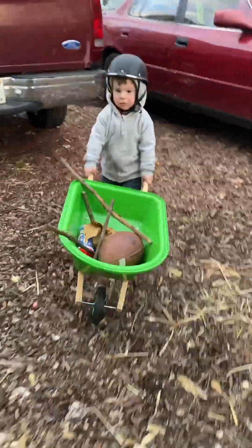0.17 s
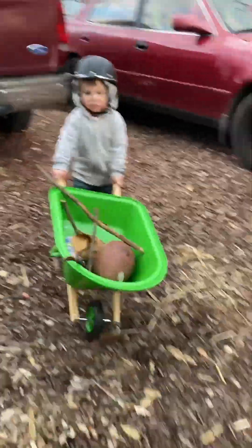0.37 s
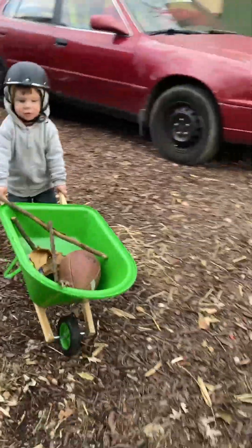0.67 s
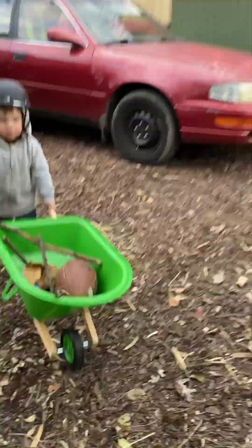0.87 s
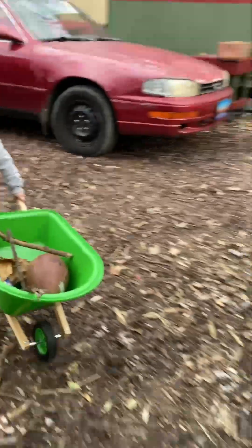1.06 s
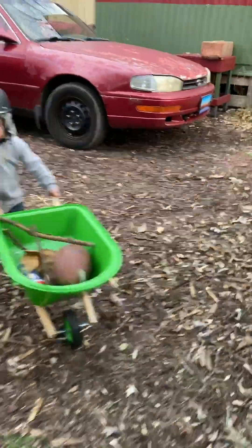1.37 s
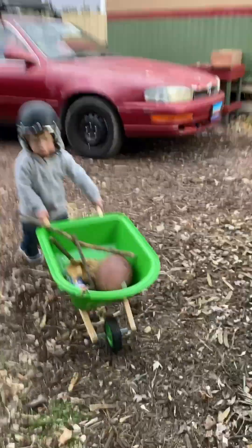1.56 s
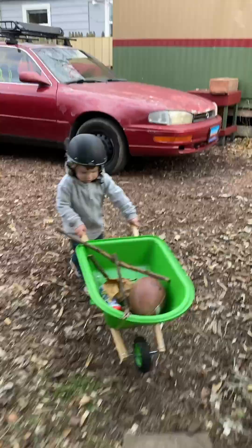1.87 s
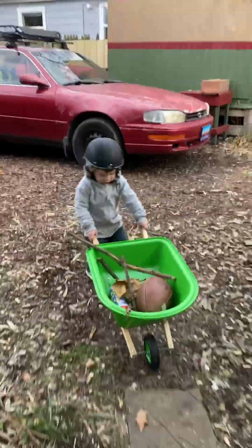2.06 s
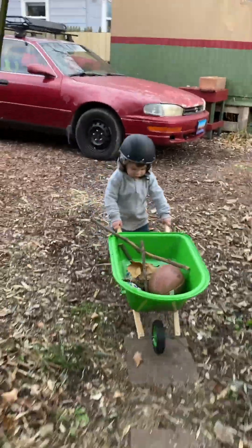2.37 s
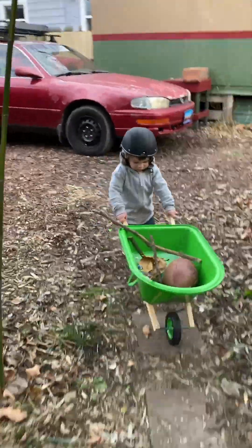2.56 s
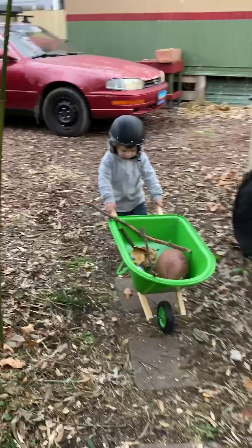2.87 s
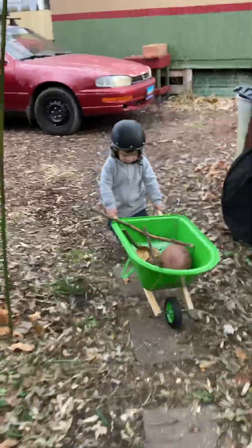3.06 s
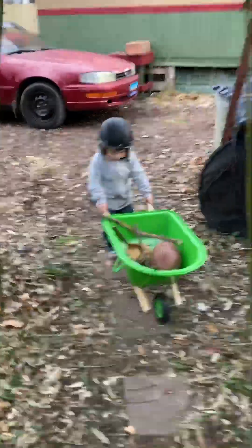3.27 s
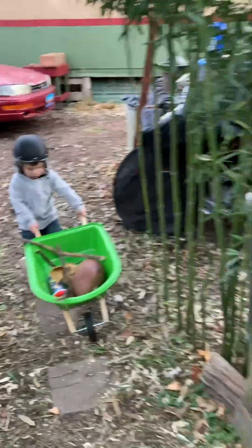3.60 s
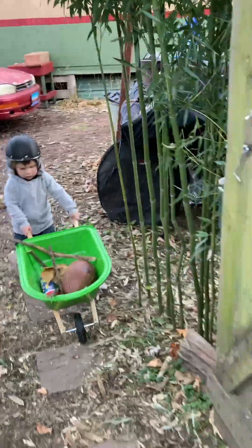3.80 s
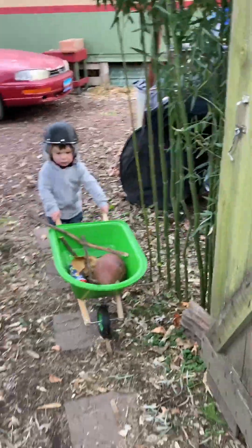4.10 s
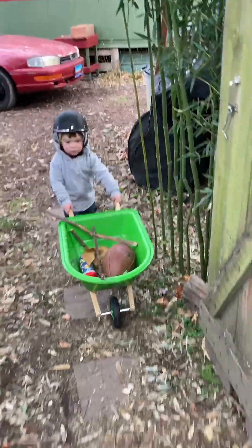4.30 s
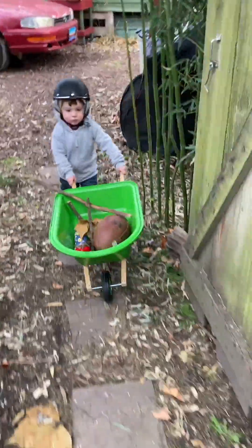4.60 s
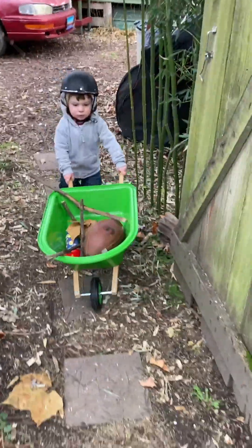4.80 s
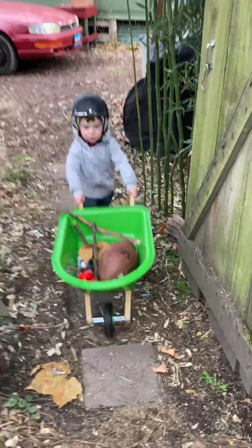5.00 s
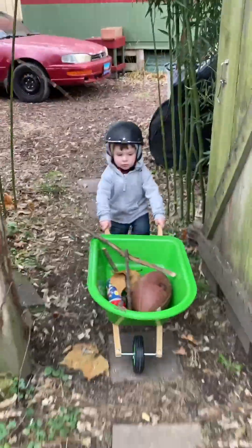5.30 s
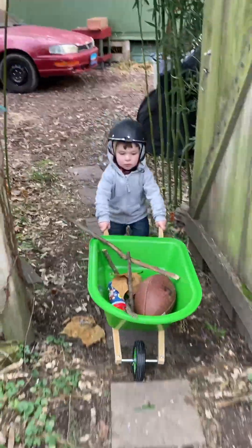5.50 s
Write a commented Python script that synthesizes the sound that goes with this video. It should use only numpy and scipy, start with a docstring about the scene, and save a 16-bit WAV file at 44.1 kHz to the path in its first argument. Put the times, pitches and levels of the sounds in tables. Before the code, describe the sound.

Wood-chip mulch crunches and snaps under a toddler's shoes and a toy wheelbarrow, its tub knocking louder as it nears.

```python
"""A yard of wood-chip mulch and paving stones: a toddler pushes a small plastic wheelbarrow closer.
Each shove sets the hollow tub rattling as random contacts drive its resonances; each bump jolts tub, hub and frame.
Chips crunch and snap under wheel and shoes as short bursts of clicks and noise, ringing at the pitch of each chip.
A bird chips once and a thin whine comes and goes over the low noise of the yard.
Two closely spaced microphone ports hear it, with phase, balance and likeness that depend on frequency."""
import sys
import numpy as np
from scipy import signal
from scipy.fft import rfft, irfft, next_fast_len
from scipy.io import wavfile
from scipy.ndimage import uniform_filter1d

SR = 44100
rng = np.random.default_rng(int(sys.argv[2]) if len(sys.argv) > 2 else 0)


def put_to_file(sound):
    """Save the sound as 16-bit audio at rate SR, in the file named by the first command-line argument."""
    columns = np.atleast_2d(sound).T  # one column per channel
    safe = np.clip(columns, -1, 1)
    whole_steps = np.round(safe * 32767)
    wavfile.write(sys.argv[1], SR, whole_steps.astype(np.int16))


N = 249165
TIME = np.arange(N) / SR

# The wheel hits a bump. Each row: start in seconds, knock of the tub in dB, clack of the hub in dB,
# thump of the frame in dB, hardness in dB, pitch of the hub in Hz.
BUMPS = [(0.043, -52, -47.5, -70, -6, 1030), (0.232, -39.5, -37, -49, 0, 964),
         (0.253, -48, -42, -60, -3, 990), (0.295, -41.5, -38, -42, -5, 970),
         (0.329, -36, -42, -49, -10, 1086), (0.467, -45, -61, -57, -3, 1086),
         (0.52, -42, -47, -41, -2, 1086), (0.552, -39, -47, -43, -12, 1086),
         (0.608, -42.5, -62, -46, -6, 1086), (0.632, -42.5, -46, -57, -2.5, 1086),
         (0.745, -46, -51, -64, -12, 1086), (0.832, -42, -56, -45, 4, 1086),
         (0.858, -39, -62, -61, -10, 1086), (0.876, -40.5, -56, -45, 0, 1086),
         (0.943, -37, -35, -47, -5, 1026), (0.995, -36.5, -66, -55, -10, 1086),
         (1.114, -48, -50, -48, -5, 1086), (1.139, -42, -50, -49, -1, 1086),
         (1.21, -37.5, -39, -40, -2, 1124), (1.234, -46, -54, -38, 0, 1086),
         (1.339, -38, -49, -35, 5, 1086), (1.42, -32.5, -35.5, -34.5, -4.5, 1080),
         (1.456, -41, -62, -44, -17, 1086), (1.523, -37.5, -44, -43, 2, 1086),
         (1.54, -37.5, -43, -56, -2, 1010), (1.705, -44, -50, -57, 1, 1086),
         (1.922, -38, -42, -45, 6, 1086), (1.953, -36.5, -46, -52, -4, 1086),
         (1.996, -44.5, -50, -42, 4, 1086), (2.23, -35, -56, -36.5, -6, 1086),
         (2.261, -47, -59, -46, -2, 1086), (2.301, -42.5, -47, -58, -3.5, 1086),
         (2.332, -42, -51, -59, 0, 1086), (2.348, -46, -47, -62, -5, 1086),
         (2.418, -39, -40, -61, 5.5, 1147), (2.46, -37.5, -62, -60, -14.5, 1086),
         (2.503, -54, -65, -57, 6, 1086), (2.651, -44, -69, -44, -18, 1086),
         (2.734, -50.5, -61, -51, 8, 1086), (2.794, -60, -51, -44.5, -2, 1086),
         (2.835, -57, -48.5, -46, 0.5, 1086), (2.954, -52, -64, -49, 18, 1086),
         (2.978, -49, -58, -46, 3, 1086), (3.057, -47, -45.5, -43.5, -1, 1086),
         (3.113, -45, -47, -53, 11, 1100), (3.294, -42.5, -38, -37.5, -0.5, 1004),
         (3.348, -47, -42, -39, -3, 1086), (3.419, -45.5, -40, -36.5, 1, 1087),
         (3.491, -38.5, -37.5, -41, -1, 1066), (3.533, -58, -48.5, -48, -0.5, 1086),
         (3.863, -38.5, -48, -40, -1.5, 1050), (3.872, -43.5, -38, -48, 1.5, 1150),
         (3.936, -50, -43, -47, -3.5, 1086), (4.01, -30.5, -34, -33, -11, 1025),
         (4.028, -44, -45, -43, -6, 1086), (4.065, -42, -47, -54, -15, 1086),
         (4.11, -37.5, -40, -30, -0.5, 1086), (4.177, -41.5, -53, -43, -11, 1086),
         (4.256, -41, -43, -32, 2.5, 1086), (4.335, -46.5, -41.5, -47, 4, 1110),
         (4.63, -43, -41, -40, 14, 1086), (4.646, -36.5, -40, -39, -8, 1086),
         (4.7, -29, -27.5, -34, 4.5, 1100), (4.742, -32, -53, -30, 3, 1086),
         (4.865, -37, -43, -37, 4, 1086), (4.973, -40, -39.5, -41, -2, 1086),
         (5.069, -29, -34, -36, 1, 1086), (5.082, -36, -32.5, -31, 1, 1086),
         (5.123, -44, -55, -43, -5, 1086), (5.148, -25, -29, -35.5, 0.5, 1086),
         (5.17, -39, -47, -38, 1, 1086), (5.189, -45, -44, -37, 3, 1120), (5.208, -32, -37, -50, 7, 1086),
         (5.246, -38, -40.5, -61, 9, 1055), (5.266, -45, -41, -52, 2, 1086),
         (5.361, -36, -41, -55, -2, 1040), (5.4, -34, -40, -43, -2, 1086), (5.468, -41, -57, -60, -7, 1086),
         (5.481, -51, -40.5, -56, -1.5, 1086), (5.529, -29.5, -54, -26.5, -5, 1086),
         (5.564, -31, -31.5, -38, 1.5, 1126), (5.615, -32, -38, -32, -2, 1086),
         (5.623, -29, -33.5, -32.5, 2, 1086), (5.642, -40, -46, -39, -2, 1086)]


def from_db(db):
    """Decibels to gain."""
    return 10 ** (np.asarray(db) / 20)


def rms_one(x):
    """Scale to rms 1."""
    return x / np.sqrt(np.mean(x ** 2) + 1e-20)


def energy_one(x):
    """Scale a short sound so that its energy equals that of 4 ms at rms 1."""
    return x / np.sqrt(np.sum(x ** 2) / (SR * 0.004) + 1e-20)


def evened(x, seconds):
    """Hold the running rms near 1, keeping the fast detail."""
    power = np.abs(uniform_filter1d(x * x, int(seconds * SR) + 1))
    return x / np.sqrt(power + 1e-3 * np.mean(x * x))


def at_hz(points, hz):
    """Read a table on a log-frequency axis."""
    table_hz, values = np.array(points).T
    return np.interp(np.log(hz + 1e-9), np.log(table_hz), values)


def add(track, s, sound):
    """Mix a sound into the track from time s on."""
    start = max(int(s * SR), 0)
    track[start:start + len(sound)] += sound[:max(N - start, 0)]


def noise(spectrum):
    """Noise of the given colour, rms 1."""
    gain = from_db(at_hz(spectrum, np.fft.rfftfreq(N, 1 / SR)))
    return rms_one(irfft(rfft(rng.standard_normal(N)) * gain, N))


def drift(rate):
    """Slow chance with rms 1: straight lines between random points, `rate` points a second."""
    points = rng.standard_normal(N // 50)
    return rms_one(np.interp(TIME * rate, np.arange(len(points)), points))


def resonate(x, hz, width):
    """A two-pole resonance with gain 1 on top."""
    r = np.exp(-np.pi * width / SR)
    poles = [1, -2 * r * np.cos(2 * np.pi * hz / SR), r * r]
    return signal.lfilter(np.array([1, 0, -1]) * (1 - r * r) / 2, poles, x + 1e-18)


def resonate_twice(x, hz, width):
    """Two equal resonances in a row, for steeper skirts."""
    return resonate(resonate(x, hz, width), hz, width)


def grains(per_s, spread_db):
    """Random contacts: many small, a few large."""
    size_db = spread_db * np.minimum(rng.exponential(1, N), 4)
    return (rng.random(N) < per_s / SR) * from_db(size_db)


def swell(s, length):
    """Gain over time: a smooth rise and fall around time s, 17 dB down at `length` to either side."""
    return np.exp(-2 * np.minimum(((TIME - s) / length) ** 2, 10))


def efforts(rows, attack_s, release_s):
    """Gain over time: each effort builds up, is held and dies away."""
    gain = 0
    for s, held, db in rows:
        attack = np.clip((TIME - s) / attack_s, 0, 1)
        release = np.exp(-np.maximum(TIME - s - held, 0) / release_s)
        gain = gain + from_db(db) * attack * release
    return gain


def yard(level_db=-63):
    """The quiet yard: steady low-heavy noise, independent at the two ports."""
    # Colour of the yard. Each row: frequency in Hz, relative density in dB per Hz.
    yard_colour = [(15, -12), (30, 17.5), (55, 15.5), (120, 3), (400, 0.5), (1000, -2), (3000, -16.5),
                   (8000, -58), (16000, -50)]
    return from_db(level_db) * np.array([noise(yard_colour), noise(yard_colour)])


def rumble(coast_db, shove, lumpy_db=0.5):
    """The ground rumbles unevenly under the wheel, more with each shove, and swells with each thud."""
    # Dull thuds on soft ground. Each row: loudest moment in seconds, level in dB.
    thud_rows = [(0.36, -44), (0.59, -46), (0.77, -52), (1.445, -41), (1.731, -43), (1.833, -45.5),
                 (2.255, -41), (2.64, -43), (2.969, -45.5), (3.05, -48.5), (3.19, -46.5), (3.39, -64),
                 (3.579, -50.5), (3.753, -46.5), (4.07, -49), (4.15, -48), (4.3, -60), (4.471, -43),
                 (4.53, -50), (4.65, -40), (4.99, -46), (5.09, -34), (5.14, -45), (5.19, -44), (5.55, -41)]
    # Colour of the ground. Each row: frequency in Hz, relative density in dB per Hz.
    ground_colour = [(15, -55), (35, -27), (50, 3.5), (70, 5), (110, 1.5), (150, -3.5), (220, -7),
                     (400, -28), (900, -76)]
    thud = sum(from_db(db) * swell(s, 0.019) for s, db in thud_rows)
    coast = from_db(coast_db + lumpy_db * drift(14))
    # -15.5 dB under a full-scale shove, falling 0.69 dB per dB of rattle
    pushed = from_db(-15.5) * shove ** 0.69
    gain = np.sqrt(coast ** 2 + pushed ** 2 + thud ** 2)
    return gain * evened(noise(ground_colour), seconds=0.0447)


def tub(force, tilt_db, stretch=1):
    """Contacts drive each mode with random strength; tilt (dB an octave) favours high modes, flexing shifts pitch."""
    # The plastic tub with its load. Each row: mode in Hz, width of each resonance in Hz, level in dB.
    tub_modes = [(177, 102, -2.5), (260, 84, 2), (323.5, 178, 2.5), (404, 224, -5), (534.3, 99, 0),
                 (670, 340, -6), (973, 190, -4.5), (1176, 220, -8), (1400, 110, -13.5), (1635, 196, -8),
                 (1770, 194, -4.5), (2300, 720, -13), (2780, 410, -14.5)]
    lowest_hz = tub_modes[0][0]
    out = 0
    for hz, width, db in tub_modes:
        mode = resonate_twice(force * rng.standard_normal(len(force)), hz * stretch, width)
        out = out + from_db(db + tilt_db * np.log2(hz / lowest_hz)) * rms_one(mode)
    return out


def rattle(gain):
    """The wheel runs over chip after chip and keeps the tub trembling."""
    force = grains(per_s=380 * from_db(6 * drift(45)), spread_db=3.0)
    return gain * evened(tub(force, tilt_db=-0.4), seconds=0.23)


def ring_on(x):
    """Tub and frame keep ringing briefly after each contact."""
    # What rings on after a contact. Each row: frequency in Hz, width in Hz, level in dB.
    ring_modes = [(273, 6.4, -23), (544, 8.3, -26), (1190, 6.8, -32), (1375, 37, -9)]
    return x + sum(from_db(db) * resonate(x, hz, width) for hz, width, db in ring_modes)


def crunch(gain, width_hz=2200, count=16, crisp_above_hz=12000):
    """Clumps of tiny fractures, each ringing briefly at the pitch of its chip; the mix keeps changing."""
    # Dry chips. Each row: frequency in Hz, level in dB.
    chip_colour = [(2000, 4.5), (3300, -7), (4500, -2), (5600, 2), (8500, -1), (11500, 1), (13500, 1),
                   (16000, -1)]
    # Top of the crunch, highest among dry leaves, lowest on the stones. Each row: time in seconds, level in dB.
    crispness = [(0.5, -1.5), (1.7, 1), (2.6, -1.5), (4.7, 0), (5.0, -3), (5.65, -3)]
    crisp_db = np.interp(TIME, *np.transpose(crispness))
    clumps = np.maximum(drift(70), -1)
    clicks = grains(per_s=3900 * from_db(6 * clumps), spread_db=0.5) * rng.choice([-1, 1], N)
    dealt = rng.integers(0, count, N)   # which chip pitch each click gets
    chips = 0
    for k, hz in enumerate(np.linspace(2500, 15800, count)):
        level_db = at_hz(chip_colour, hz) + 2.0 * drift(25) + crisp_db * (hz > crisp_above_hz)
        chips = chips + from_db(level_db) * resonate(clicks * (dealt == k), hz, width_hz)
    return gain * evened(chips, seconds=0.081)


def crackle(gain, level_db=-7, per_s=95, low_hz=650, high_hz=2700, width_share=0.25, fall_db=-4, count=8):
    """Coarse chips and twigs knock under the wheel with short woody pitches, high ones weaker (dB an octave)."""
    clicks = grains(per_s=per_s, spread_db=4.0)
    dealt = rng.integers(0, count, N)
    wood = 0
    for k, hz in enumerate(np.geomspace(low_hz, high_hz, count)):
        knocks = resonate_twice(clicks * (dealt == k), hz, width_share * hz)
        wood = wood + rms_one(knocks) * from_db(fall_db * np.log2(hz / low_hz))
    return gain * from_db(level_db) * evened(wood, seconds=0.087)


def jolts(chatter_s=0.05, chatter_per_s=900, tilt_db=-1.5, tick_db=-20, tick_hz=4200):
    """A bump shakes the tub with a tight cluster of contacts; the stronger it is, the more the load chatters."""
    out, t = np.zeros(N), TIME[:SR // 6]
    contact_s = 0.002   # time to the strongest contact
    hit = t / contact_s * np.exp(1 - t / contact_s)
    for s, knock_db, _, _, hardness_db, _ in BUMPS:
        # 5.5 dB above the contact cluster at a full-scale knock, sinking 0.4 dB per dB that the knock is weaker
        chatter = from_db(5.5 + 0.4 * knock_db) * np.exp(-t / chatter_s)
        chatter = chatter * (rng.random(len(t)) < chatter_per_s / SR)
        cluster = hit * (rng.random(len(t)) < 4000 / SR)
        stretch = np.exp(0.061 * rng.standard_normal())   # the modes shift from bump to bump
        knock = tub(cluster + chatter, tilt_db=tilt_db + 0.52 * hardness_db, stretch=stretch)
        tick = resonate(hit * rng.standard_normal(len(t)), tick_hz, tick_hz)   # grit under the tyre
        both = energy_one(knock) + from_db(tick_db + hardness_db) * energy_one(tick)
        add(out, s, from_db(knock_db) * both)
    return out


def clacks(detune_share=0.025, spread_db=1.2, tilt_db=1.34):
    """The loose hub strikes its axle once a jolt and rings; its seating changes pitch and brightness."""
    # The wheel hub. Each row: mode in Hz, width of each resonance in Hz, level in dB.
    hub_modes = [(535.5, 114, -1), (1086, 240, 0), (1467, 240, -3.5), (1720, 140, -14)]
    out, blow = np.zeros(N), signal.unit_impulse(SR // 15)
    main_hz = hub_modes[1][0]
    for s, _, clack_db, _, hardness_db, hub_hz in BUMPS:
        ring = 0
        chances = rng.standard_normal((len(hub_modes), 2))
        for (hz, width, db), (detune, strength) in zip(hub_modes, chances):
            # tilt: dB an octave per dB of hardness
            mode_db = db + spread_db * strength + tilt_db * hardness_db * np.log2(hz / main_hz)
            mode_hz = hz * hub_hz / main_hz * np.exp(detune_share * detune)
            ring = ring + from_db(mode_db) * rms_one(resonate_twice(blow, mode_hz, width))
        add(out, s + 0.001014, from_db(clack_db) * energy_one(ring))
    return out


def thumps(frame_hz=74, stiff_hz=120, relax_s=0.0094, swell_s=0.0057, lag_s=0.002):
    """Tyre and frame answer each jolt with a few slow swings, whose pitch falls as the tyre relaxes."""
    out, t = np.zeros(N), TIME[:SR // 6]
    cycles = np.cumsum(frame_hz + stiff_hz * np.exp(-t / relax_s)) / SR
    envelope = t / swell_s * np.exp(1 - t / swell_s)
    chances = rng.standard_normal((len(BUMPS), 2))
    for (s, _, _, thump_db, _, _), (detune, phase) in zip(BUMPS, chances):
        swing = np.sin(2 * np.pi * (cycles * np.exp(0.2 * detune) + phase))
        add(out, s + lag_s, from_db(thump_db) * swing * envelope)
    return out


def grinds(level_db=-11, rise_s=0.0084, fall_s=0.0023, per_s=3000, hardness_share=0.62):
    """From the start of each jolt the tyre grinds grit, louder and louder for 20 ms, then stops quickly."""
    # Grit ground under the tyre. Each row: frequency in Hz, width of each resonance in Hz, level in dB.
    grit_bands = [(1400, 870, 6), (2000, 1050, -7), (4250, 4100, 1)]
    out, t = np.zeros(N), TIME[:SR // 25] - 0.02
    press = np.exp(np.minimum(t / rise_s, -t / fall_s))
    for s, knock_db, _, _, hardness_db, _ in BUMPS:
        contacts = press * rng.standard_normal(len(t)) * (rng.random(len(t)) < per_s / SR)
        grit = 0
        for hz, width, db in grit_bands:
            grit = grit + from_db(db) * rms_one(resonate_twice(contacts, hz, width))
        add(out, s, from_db(knock_db + level_db + hardness_share * hardness_db) * energy_one(grit))
    return out


def scuffs(slide_db=-6, catch_db=-10.0, ring_cycles=4.1, spread_octaves=0.373):
    """A sole or the tyre drags through mulch: a fine sliding rustle, and catches ringing near the rasp's pitch."""
    # Shoes or tyre dragging. Each row: middle in seconds, time from there to 17 dB down in seconds,
    # level in dB, rasp in Hz.
    drags = [(0.119, 0.02, -52, 1980), (0.215, 0.023, -47, 1270), (0.3, 0.071, -55.5, 850),
             (0.517, 0.02, -46, 1840), (0.549, 0.026, -62, 655), (0.939, 0.028, -43, 720),
             (0.831, 0.085, -50, 1820), (1.224, 0.043, -49.5, 1710), (1.328, 0.07, -49, 2240),
             (1.424, 0.035, -48.5, 1740), (1.907, 0.033, -44, 5130), (2.135, 0.025, -55.5, 2300),
             (2.249, 0.022, -54, 1880), (2.321, 0.072, -58, 2000), (2.451, 0.024, -46, 2270),
             (2.507, 0.019, -50, 1810), (3.085, 0.097, -51, 2600), (3.17, 0.075, -48.5, 3010),
             (3.872, 0.026, -48, 1670), (4.041, 0.033, -53, 1600), (4.224, 0.038, -49, 1750),
             (4.938, 0.0093, -48, 3700), (5.077, 0.035, -38, 1540), (5.206, 0.083, -45, 1400),
             (5.631, 0.029, -38, 1680)]
    # Colour of the rustle. Each row: frequency in Hz, relative density in dB per Hz.
    rustle_colour = [(300, -15), (1000, 3.5), (1700, 6), (3000, -2), (5000, 2.5), (10000, -6.5),
                     (16000, -9.5)]
    catches_per_s, size_db = 250, 3.5
    slide = sum(from_db(db) * swell(s, length) for s, length, db, _ in drags)
    out = noise(rustle_colour) * from_db(slide_db + 1.5 * drift(200)) * slide
    t = TIME[:SR // 60]
    for s, length, db, hz in drags:
        chances = rng.standard_normal((int(catches_per_s * length) + 4, 3)).clip(-2, 2)
        for when, pitch, size in chances:
            cycles = hz * 2 ** (spread_octaves * pitch) * t
            ping = np.sin(2 * np.pi * cycles) * np.exp(-cycles / ring_cycles) * (1 - np.exp(-cycles))
            add(out, s + when * length / 2, from_db(db + catch_db + size_db * size) * energy_one(ping))
    return out


def twigs(tear_s=0.003, fibres_per_s=1100, spread_octaves=0.44, ring_cycles=2.1, size_db=4, count=7):
    """A twig breaks fibre by fibre: a quick, fading run of woody cracks, each near the pitch of the twig."""
    # Twigs and coarse chips cracking under wheel or shoe. Each row: start in seconds, level in dB, pitch in Hz.
    breaks = [(0.143, -53, 980), (0.35, -48, 1340), (0.445, -51, 1470), (0.522, -44, 2300),
              (0.55, -49, 1960), (1.16, -55, 1500), (1.344, -47, 3420), (1.537, -55, 2430),
              (2.229, -49.5, 2000), (2.265, -50, 1900), (2.31, -48.5, 1700), (2.438, -49, 1830),
              (2.46, -52, 2300), (2.489, -49, 2000), (2.733, -53, 3030), (3.117, -51, 1880),
              (3.153, -48, 3200), (3.421, -53.5, 2750), (3.49, -50, 3960), (3.856, -54, 2580),
              (4.208, -49, 1400), (4.259, -45, 2200), (4.664, -49, 1900), (4.696, -40, 2730),
              (4.735, -53, 1600), (5.079, -41, 2400), (5.097, -50, 1500), (5.148, -37, 2480),
              (5.207, -41, 1970), (5.371, -43.5, 1710), (5.565, -44, 1700), (5.624, -40, 2000)]
    out, t = np.zeros(N), TIME[:SR // 25]
    for s, db, hz in breaks:
        gaps = rng.uniform(0.3, 1.7, count) / fibres_per_s
        delays = np.cumsum(gaps) - gaps[0]
        crack = 0
        for delay, (pitch, size) in zip(delays, rng.standard_normal((count, 2)).clip(-2, 2)):
            cycles = hz * 2 ** (spread_octaves * pitch) * np.maximum(t - delay, 0)
            ring = np.sin(2 * np.pi * cycles) * np.exp(-cycles / ring_cycles) * (1 - np.exp(-cycles))
            crack = crack + from_db(size_db * size) * np.exp(-delay / (2 * tear_s)) * ring
        add(out, s, from_db(db) * energy_one(crack))
    return out


def snaps(tail_s=0.024, width_share=0.88, crack_s=0.0004):
    """A dry chip breaks: a faint rise of noise, a sharp crack, slower in low chips, then a short noisy tail."""
    # Chips that break. Each row: crack in seconds, level in dB, pitch in Hz.
    broken_chips = [(0.24, -47.5, 7740), (0.291, -48.5, 8760), (0.376, -51, 9600), (0.446, -49, 9100),
                    (0.6, -52, 8850), (0.828, -41, 14500), (0.8935, -38, 8200), (0.923, -43.5, 8700),
                    (1.037, -52, 9200), (1.1473, -52.5, 8700), (1.324, -46, 8150), (1.3414, -37, 7900),
                    (1.54, -45.5, 8000), (1.844, -49, 8300), (1.8986, -46, 7750), (1.9203, -36, 8700),
                    (2.2271, -42.5, 7340), (2.61, -47, 13800), (2.66, -52, 9400), (2.732, -47.5, 7260),
                    (3.243, -45, 9450), (3.2745, -41.5, 7650), (3.305, -35.5, 14000), (3.322, -38.5, 8700),
                    (3.491, -57, 13000), (3.8092, -54, 7800), (3.855, -43.5, 7900), (3.896, -49, 7800),
                    (3.943, -37, 12000), (4.0974, -49, 8950), (4.204, -36, 10800), (4.2448, -38.5, 7950),
                    (4.251, -30.5, 10200), (4.297, -45, 7830), (4.323, -30.5, 11300), (4.417, -46, 10000),
                    (4.443, -43, 14500), (4.624, -42.5, 8200), (4.681, -34, 13000), (4.72, -36, 8400),
                    (4.764, -46, 8800), (4.847, -43.5, 8550), (4.861, -41, 8500), (4.9376, -47, 8300),
                    (5.002, -38, 7800), (5.044, -42, 12700), (5.078, -29.5, 7840), (5.121, -35.5, 8700),
                    (5.148, -30.5, 7840), (5.1856, -43, 8700), (5.205, -29.5, 9100), (5.245, -39, 7700),
                    (5.282, -40, 12800), (5.362, -44, 8200), (5.525, -40, 8700), (5.535, -38.5, 8500),
                    (5.614, -34.5, 7900), (5.643, -33, 8550)]
    lead_s, lead_in_s, lead_in, tail = 0.008, 0.002, 0.11, 0.11
    out, t = np.zeros(N), TIME[:SR // 16] - lead_s
    after = np.maximum(t, 0)
    rise = lead_in * np.exp(-np.abs(t) / lead_in_s)
    lead_and_tail = np.where(t < 0, rise, tail * np.exp(-after / tail_s))
    thin = signal.butter(2, 3500, "high", fs=SR, output="sos")
    for s, db, hz in broken_chips:
        age = after / crack_s * (hz / 12000) ** 2   # a 12 kHz chip peaks after crack_s
        burst = rng.standard_normal(len(t)) * (age * np.exp(1 - age) + lead_and_tail)
        snap = signal.sosfilt(thin, resonate(burst, hz, width_share * hz))
        add(out, s - lead_s, from_db(db) * energy_one(snap))
    return out


def whine(hz=12860, width_hz=280):
    """A thin, unsteady whistle of narrow noise that swells and fades, the same in both channels."""
    # Faint high whine. Each row: middle in seconds, time from there to 17 dB down in seconds, level in dB.
    whistles = [(1.427, .1, -65), (2.315, 0.065, -61), (2.965, 0.061, -63), (3.49, 0.025, -69),
                (4.65, 0.14, -66), (5.246, .1, -57)]
    gain = sum(from_db(db) * swell(s, length) for s, length, db in whistles)
    return gain * rms_one(resonate_twice(rng.standard_normal(N), hz, width_hz))


def flexes(waver=0.034, flutter_db=2):
    """A strained wall of the tub hums for a moment, its pitch wavering and gliding up or down."""
    # The wall flexes and hums. Each row: middle in seconds, time from there to 17 dB down in seconds,
    # level in dB, pitch at the middle in Hz, glide in octaves per second.
    hums = [(2.243, 0.022, -46, 240, 5), (5.202, 0.034, -35.5, 368, -4), (5.266, 0.042, -49.5, 1180, -1.5),
            (5.366, 0.03, -45, 292, 2), (5.592, 0.0092, -38, 285, 1)]
    out, wobble = np.zeros(N), np.exp(waver * drift(90))
    for s, length, db, hz, glide in hums:
        pitch = hz * wobble * 2 ** (glide * np.clip(TIME - s, -2 * length, 2 * length))
        tone = np.sqrt(2) * np.sin(2 * np.pi * np.cumsum(pitch) / SR)
        out += from_db(db) * swell(s, length) * tone
    return out * from_db(flutter_db * drift(120))


def bird(start=2.686, top_hz=7000, level_db=-38, length=0.016):
    """One rising chip from two sides of the syrinx, tuned 1 % apart, with an echo off the wall."""
    t = TIME[:int(length * SR)]
    phase = 2 * np.pi * np.cumsum(top_hz - 1000 * np.exp(-t / 0.0035)) / SR
    voices = np.sin(phase) + 0.89 * np.sin(0.99 * phase)
    note = from_db(level_db) * np.sin(np.pi * t / length) * voices
    out = np.zeros(N)
    add(out, start, note)
    add(out, start + 0.00866, 0.7 * note)
    return out


def scatter(x, count=6):
    """Short echoes off ground and fence, which come and go as barrow and microphone move."""
    lags = (rng.uniform(0.001, 0.012, count) * SR).astype(int)
    return sum(drift(9) * np.pad(x, (lag, 0))[:N] for lag in lags) / np.sqrt(count)


def ports(x):
    """Direct sound reaches the ports with a phase offset by frequency; scattered sound differs between them."""
    # Phase between the ports. Each row: frequency in Hz, lead of the left in radians.
    port_phase = [(30, 0.38), (400, -.4), (900, 0), (1500, 0.23), (3000, 1.84), (4300, 1.63), (5400, 2.94),
                  (8200, 5.99), (9000, 6.3), (11750, 9.4), (14600, 11.76), (16400, 12.4)]
    # Balance of the ports. Each row: frequency in Hz, left minus right in dB.
    port_balance = [(60, 0.5), (130, 0), (350, -2.5), (550, -5), (780, -2.5), (1100, 0.5), (1350, -2),
                    (1800, -0.5), (2300, -2.5), (2900, 0), (16000, 0)]
    # Likeness of the ports. Each row: frequency in Hz, share of direct power from 0 to 1.
    port_likeness = [(30, 0.96), (70, 0.81), (130, 1), (400, 0.88), (780, 0.55), (1100, 0.72), (2000, 0.9),
                     (3300, 0.7), (4500, 1), (5500, 0.97), (7000, 0.73), (11700, 1), (13000, 0.75),
                     (16000, 0.095)]
    size = next_fast_len(N + SR // 10)
    hz = np.fft.rfftfreq(size, 1 / SR)
    alike = np.clip(at_hz(port_likeness, hz), 0, 1)
    sides = np.array([[1], [-1]]) / 2   # half of each difference goes to either port
    direct = rfft(x, size) * np.exp(1j * sides * at_hz(port_phase, hz))
    diffuse = rfft(np.array([scatter(x), scatter(x)]), size)
    mixed = np.sqrt(alike) * direct + np.sqrt(1 - alike) * diffuse
    return irfft(mixed * from_db(sides * at_hz(port_balance, hz)), size)[:, :N]


def scene(tread_crackle_db=-6):
    """Barrow, mulch and bird over the quiet yard."""
    # Slow rolling between shoves, louder as the barrow nears. Each row: time in seconds,
    # ground rumble in dB, tub rattle in dB, chip crunch in dB.
    coasting = [(0, -55.5, -58, -62), (0.7, -52.5, -59, -59), (1.05, -51, -58, -63.5),
                (1.4, -48.5, -51.5, -55), (2.1, -56, -62, -58.5), (2.62, -53, -59.5, -57.5),
                (2.88, -57.5, -65, -60.5), (3.14, -52.5, -64, -57), (3.35, -53.5, -57.5, -57.5),
                (3.65, -58.5, -72, -65), (3.799, -56, -65.5, -62), (4.1, -52, -63, -57.5),
                (4.4, -53.5, -69, -52), (4.55, -50, -51, -54), (4.83, -53, -59, -60),
                (5.3, -44, -45.5, -56.5), (5.65, -61, -54.5, -50.5)]
    # Shoves that speed the wheel up. Each row: start in seconds, time to release in seconds, tub rattle in dB.
    shove_rows = [(0.228, 0.11, -48), (0.515, 0.036, -44.5), (0.943, 0.0062, -43.5), (1.205, 0.028, -57),
                  (1.412, 0.095, -51), (1.92, 0.14, -56), (2.225, 0.13, -52), (2.41, 0.027, -55),
                  (2.6, 0.02, -51.5), (3.855, 0.13, -55), (4.005, 0.023, -45), (4.15, 0.1, -52.5),
                  (4.615, 0.028, -49), (4.675, 0.05, -47), (4.93, 0.054, -48.5), (5.06, 0.19, -42),
                  (5.36, 0.046, -54), (5.525, 0.019, -43), (5.612, 0.054, -40)]
    # Shoes pressing into the mulch. Each row: start in seconds, time to release in seconds, crunch in dB.
    tread_rows = [(0.205, 0.1, -56), (0.42, 0.082, -54), (0.8, 0.15, -62.5), (1.2, 0.027, -54),
                  (1.33, 0.11, -54.5), (1.5, 0.1, -58), (1.69, 0.044, -50.5), (1.855, 0.085, -50.5),
                  (2.11, 0.055, -55.5), (2.245, 0.11, -54), (2.72, 0.14, -60), (3.06, 0.049, -58),
                  (3.855, 0.19, -57.5), (4.1, 0.15, -48.5), (4.33, 0.14, -53.5), (4.625, 0.14, -47),
                  (4.775, 0.083, -65), (4.865, 0.22, -51), (5.06, 0.24, -50.5), (5.359, 0.026, -44.5),
                  (5.585, .07, -44)]
    s, *columns = np.transpose(coasting)
    rumble_db, rattle_db, crunch_db = [np.interp(TIME, s, column) for column in columns]
    shove = efforts(shove_rows, attack_s=0.0022, release_s=0.041)
    tread = efforts(tread_rows, attack_s=0.0057, release_s=0.02)
    rolling = np.hypot(from_db(rattle_db), shove)
    crunching = np.hypot(from_db(crunch_db), tread)
    crackling = np.hypot(rolling, from_db(tread_crackle_db) * tread)
    plastic = ring_on(rattle(rolling) + jolts() + clacks())
    barrow = rumble(rumble_db, shove) + plastic + flexes() + thumps()
    mulch = crunch(crunching) + crackle(crackling) + snaps() + twigs() + grinds() + scuffs()
    return ports(barrow + mulch + bird()) + yard() + whine()


def record(dry):
    """The ports ring faintly in the treble; deep bass and top are cut."""
    coloured = dry + 0.5 * resonate(dry, 4650, 250) + 0.38 * resonate(dry, 8510, 520)
    coloured = signal.sosfilt(signal.butter(2, 34, "high", fs=SR, output="sos"), coloured)
    return signal.sosfilt(signal.ellip(10, 0.2, 70, 15900, fs=SR, output="sos"), coloured)


dry = scene()
out = record(dry)
put_to_file(out)
```